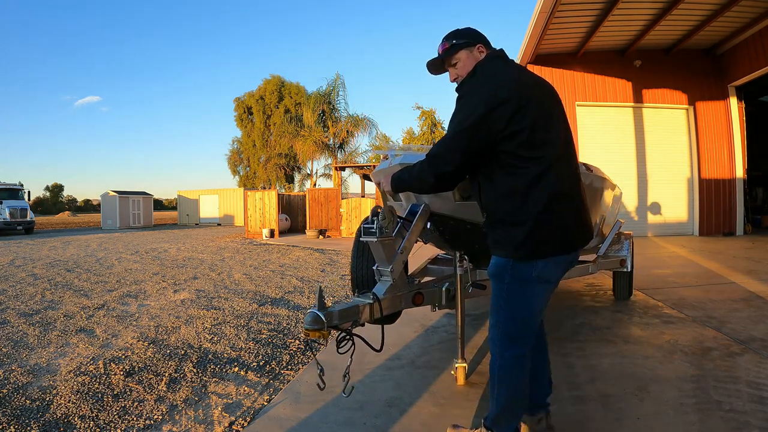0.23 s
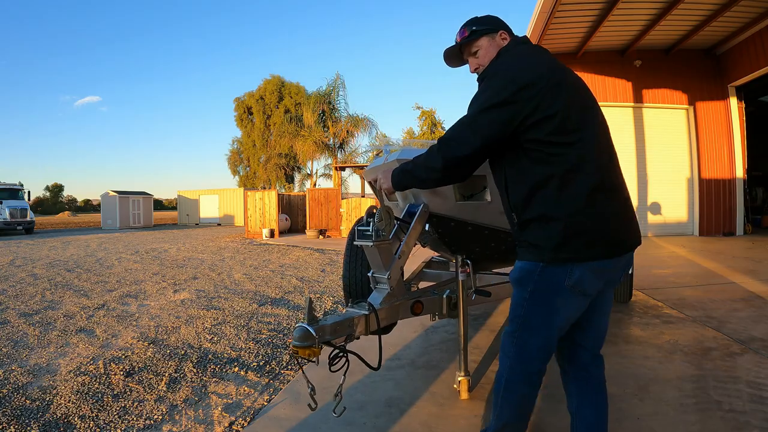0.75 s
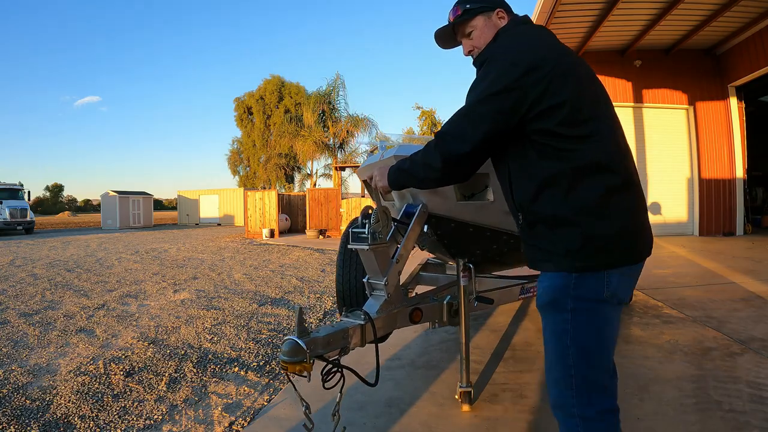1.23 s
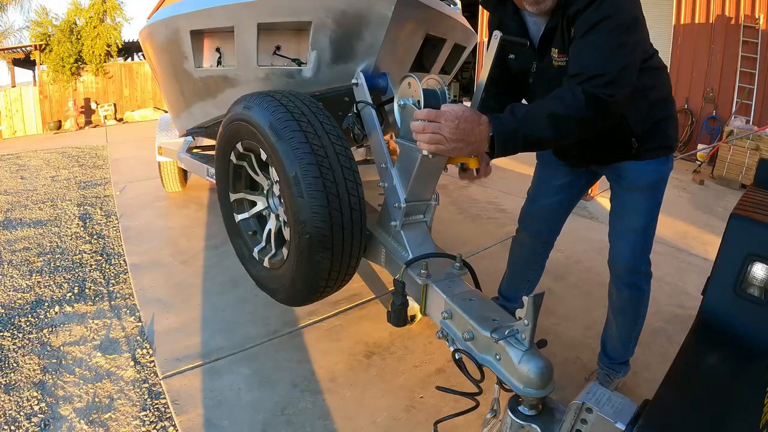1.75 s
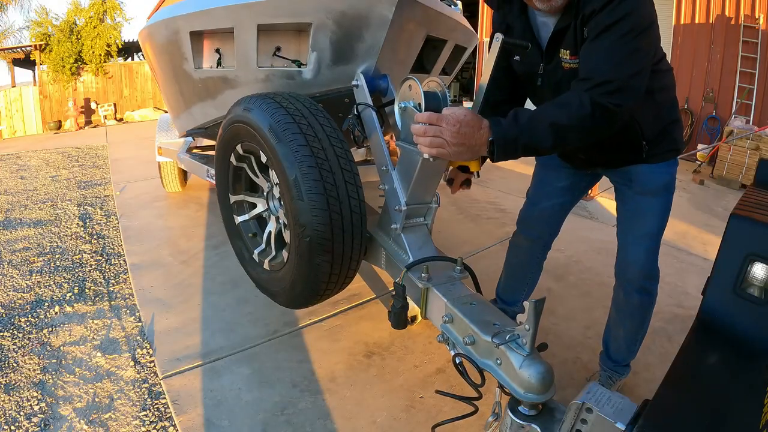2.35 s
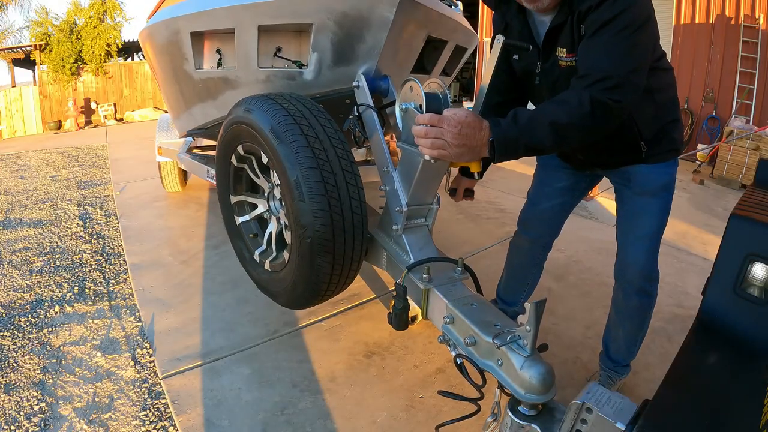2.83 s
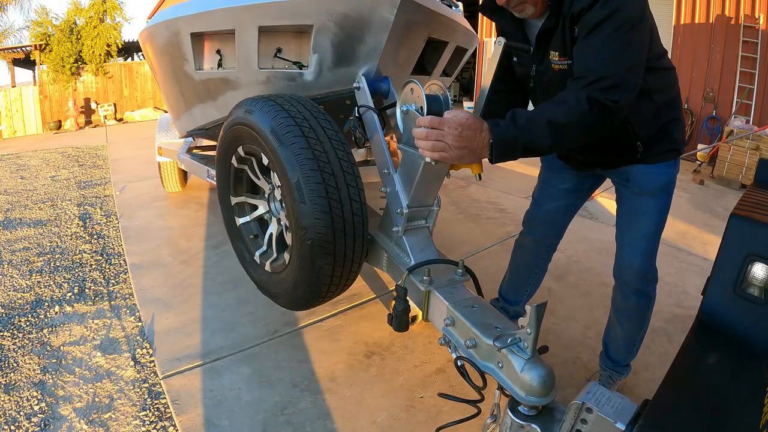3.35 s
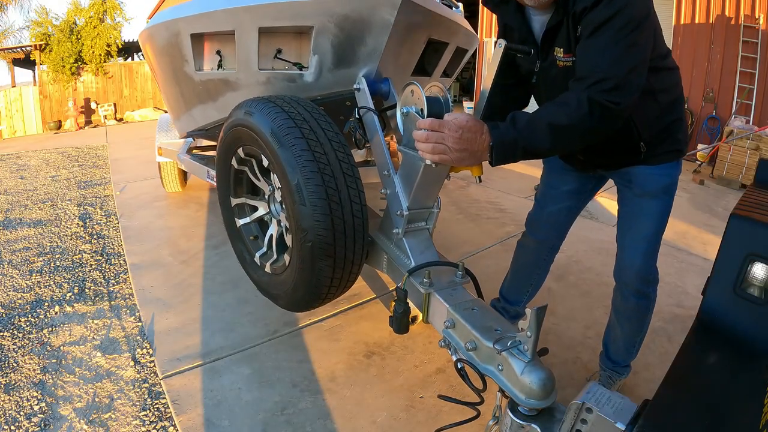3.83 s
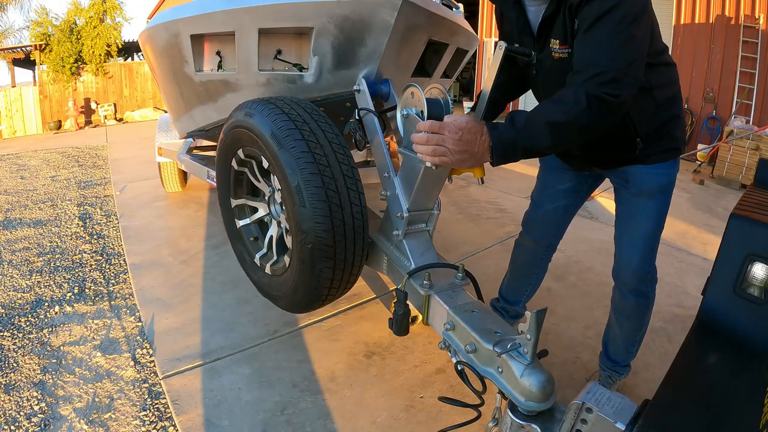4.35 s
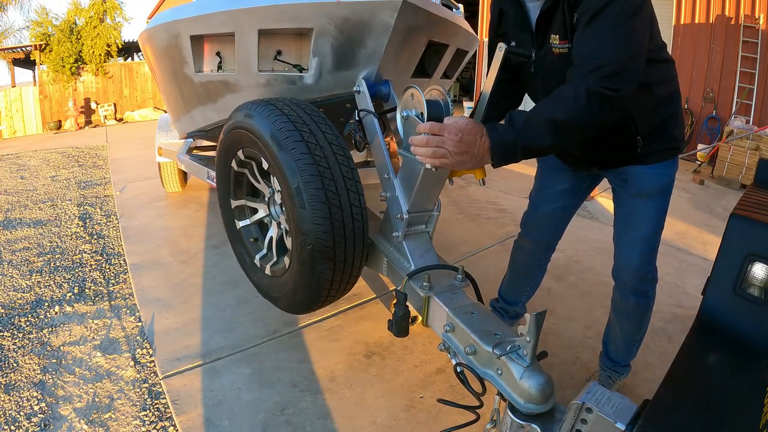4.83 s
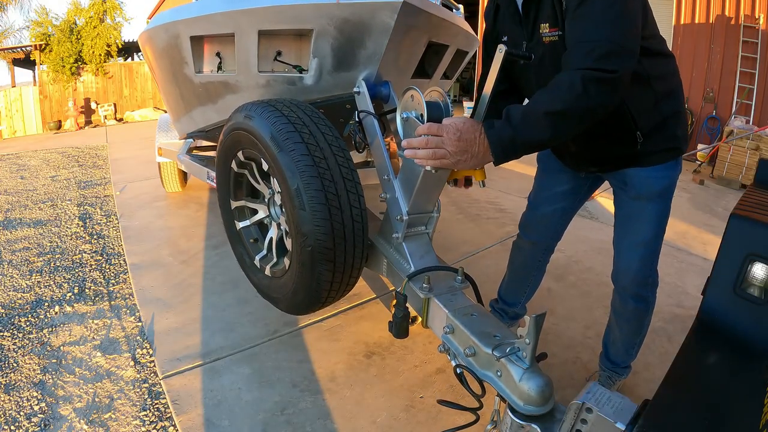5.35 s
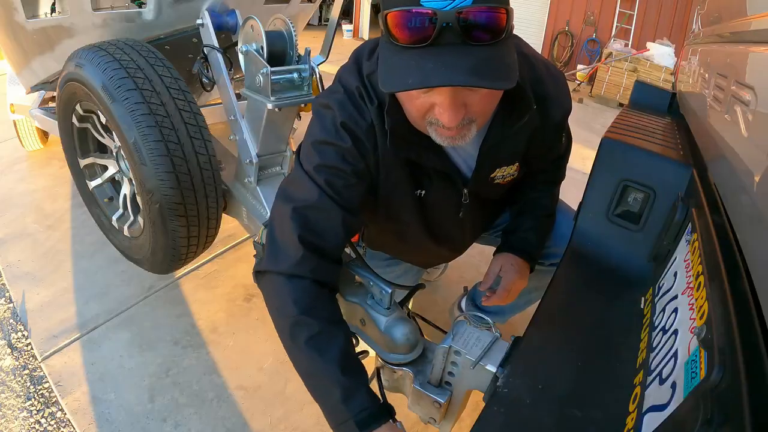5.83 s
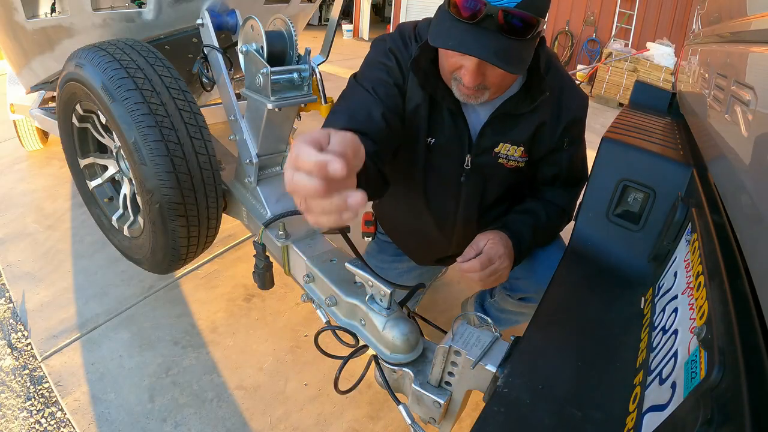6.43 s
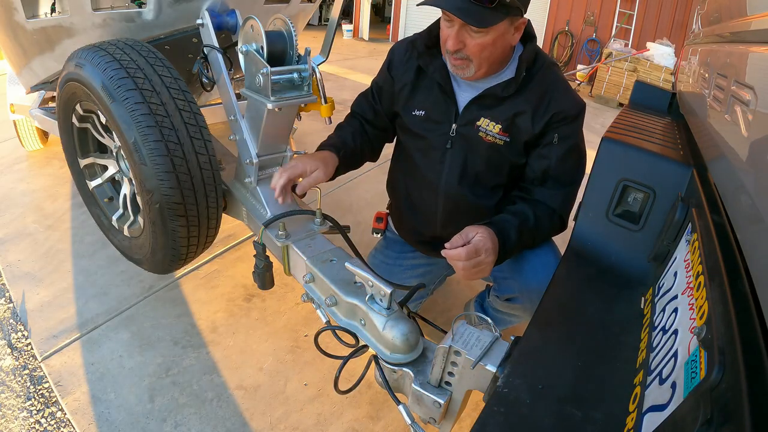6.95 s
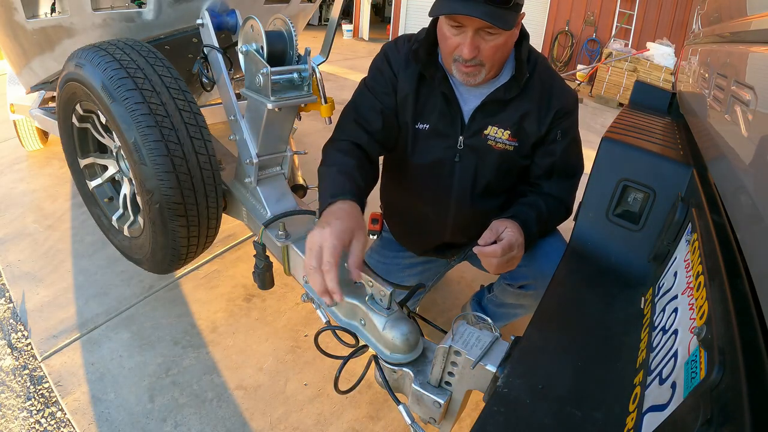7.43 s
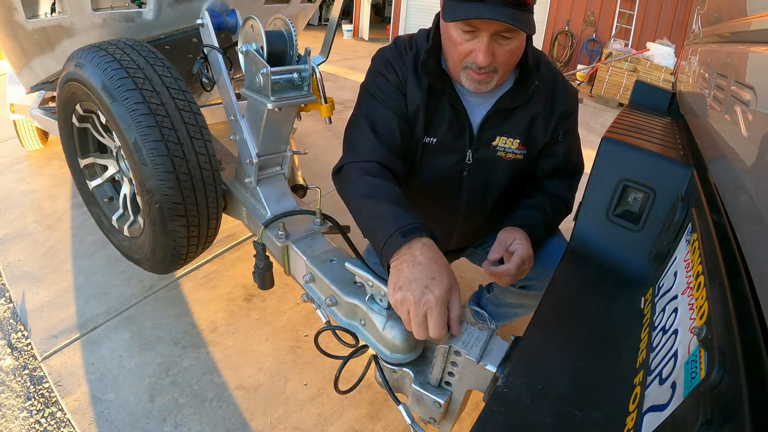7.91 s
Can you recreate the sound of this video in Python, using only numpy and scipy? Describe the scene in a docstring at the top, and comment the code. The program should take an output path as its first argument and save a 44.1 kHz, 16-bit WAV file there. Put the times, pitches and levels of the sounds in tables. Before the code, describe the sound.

Loose steel knocks and rattles as a trailer jack is cranked, then the hitch latch shuts with a loud ringing clank.

```python
"""Hitching a boat trailer

A trailer rolls to a car on a concrete yard, its hull droning. The jack is cranked up: loose steel
knocks and rattles, jolts boom in the hull. The coupler latch snaps shut, ringing a steel pin and
the hollow tongue. Distant traffic rumbles throughout; jacket sleeves rustle at the end."""
import sys
import numpy as np
from scipy import signal
from scipy.fft import rfft, irfft
from scipy.io import wavfile

SR = 44100
rng = np.random.default_rng(int(sys.argv[2]) if len(sys.argv) > 2 else 0)


def transcribe(signal):
    """Save signal, clipped to [-1, 1], as a 16-bit WAV file at the path in sys.argv[1]."""
    frames = np.atleast_2d(signal).T
    limited = np.clip(frames, -1, 1)
    pcm = np.round(limited * 32767).astype(np.int16)
    wavfile.write(sys.argv[1], SR, pcm)


N = 360738
TIME_S = np.arange(N) / SR
SPAN = 2 ** 14   # samples per blow
AGE_S = np.arange(SPAN) / SR

# jack and frame knocks: start_s, level_db, focus_hz, chatter_ms, tilt_db_per_octave, after_ring_db
JACK_KNOCKS = [(0.0762, -21.5, 1800, 15, -5.5, -4.5), (.1041, -24, 2600, 7.8, -8, -2),
               (0.1293, -14, 2650, 11, -12.5, -13), (.1634, -26, 2440, 4.9, -8, -6),
               (0.2712, -33.5, 2180, 6.7, -3, -3), (0.5077, -30, 2070, 4.1, -6, -2),
               (0.545, -34, 1480, 3.8, -3, 1), (.581, -38, 1240, 4.3, -8, -14),
               (0.5906, -15.5, 2000, 3.7, -6, -41), (0.862, -24.5, 1410, 15, -6.5, -29),
               (1.3859, -36, 1750, 3.3, 3, -1), (1.4058, -28.5, 4730, 15, 2, -18),
               (1.4746, -35, 1220, 7, -13, -3), (1.668, -19, 2500, 9.2, -1, -8.5),
               (1.69, -25.5, 2970, 4.9, -9, -6), (1.7787, -17, 2500, 11.5, -.5, -7),
               (1.8871, -20, 3000, 8.5, -6.5, -11.5), (2.004, -28.5, 2780, 5.3, 6, -8),
               (2.0538, -14.5, 6600, 8.9, 1.5, -14), (2.089, -15, 3230, 2, -7, -29),
               (2.101, -15.5, 1770, 2.7, -2.5, -7), (2.114, -24, 5500, 5, 6, -18),
               (2.136, -11, 2840, 2.8, -7.5, -17.5), (2.175, -24, 1270, 6, -2, -27),
               (2.2312, -19, 1230, 10, 1.5, -10), (2.2635, -20, 4200, 17, -4, -34),
               (2.2737, -6, 2570, 8.6, -2.5, -20.5), (2.36, -28, 2420, 8.7, -8, 1),
               (2.373, -24.5, 2800, 9.9, 9, -12), (2.4284, -18, 4530, 11, 8, -13),
               (2.4507, -16.5, 3270, 4.7, -5.5, -17), (2.4942, -19, 1230, 9.1, 1.5, -11.5),
               (2.586, -28.5, 1730, 8.7, 1, -14), (2.7884, -20.5, 2170, 9.7, -10.5, -16),
               (2.8412, -28.5, 2020, 4.5, -3, -4), (2.868, -24, 4400, 6, 9.5, -4),
               (2.882, -13.5, 3100, 3.7, -6, -11.5), (2.9032, -19, 2600, 6.4, 4.5, -13),
               (2.9733, -23.5, 3800, 5.8, 8.5, -9), (3.0018, -19.5, 1750, 2.2, -7, -11.5),
               (3.0268, -22, 3600, 12, 4.5, -12), (3.1078, -29.5, 1240, 6, -3, -9),
               (3.258, -28, 3500, 9.2, 0.5, -21), (3.3185, -23.5, 2960, 5.4, 4, 4.5),
               (3.3279, -18, 2270, 3.8, -6, 3), (3.3524, -8, 4470, 11, 9, -10),
               (3.3948, -16.5, 2540, 6.1, -8.5, -4.5), (3.5562, -22, 1230, 8.8, -3.5, -18),
               (3.6705, -9, 2540, 14.5, -4.5, -16.5), (3.7455, -18, 1920, 6.4, -1.5, -2),
               (3.7722, -19, 3360, 11, 6.5, -20), (3.805, -26, 1990, 4.6, 4, -7),
               (3.8704, -18.5, 2500, 21, 3, -26), (3.923, -20, 3540, 6.1, 7, -14),
               (3.9732, -11, 2770, 11, -6.5, -14), (3.995, -26, 3430, 5.9, -1, -6),
               (4.216, -22.5, 1750, 7.8, -3, -5), (4.2499, -5.5, 6860, 9.7, -0.5, -13.5),
               (4.349, -20.5, 6530, 6, 2, -13), (4.4059, -19, 2130, 4, -5, -15),
               (4.433, -20, 1260, 6.7, -1, -13), (4.456, -9.5, 2330, 12.4, -4.5, -13.5),
               (4.7142, -23, 1700, 17, -0.5, -5), (4.848, -8.5, 3140, 2, -3.5, -19),
               (4.877, -34, 1210, 8.1, 11, -20), (4.9934, -27.5, 2140, 5, -9.5, -7),
               (5.2489, -19.5, 2110, 10.4, 1, -7), (5.3975, -9, 3640, 2.7, -3, -15.5),
               (5.444, -33.5, 2000, 3.7, 1, -35), (5.5689, -17.5, 3460, 4.6, -1.5, -9.5),
               (5.6035, -24, 2650, 2.9, -3, -3.5), (5.837, -5.5, 4940, 11, 8, -19),
               (5.951, -16, 5000, 6, 10, -13), (6.2636, -29.5, 1920, 5.4, 14, -22)]


def from_db(db):
    """Decibels to gain."""
    return 10 ** (np.asarray(db) / 20)


def rms_one(x):
    """Scale to rms 1."""
    return x / np.sqrt(np.mean(x ** 2) + 1e-20)


def peak_one(x):
    """Scale to peak 1."""
    return x / np.max(np.abs(x))


def add(out, start_s, sound):
    """Mix in one blow."""
    i = round(start_s * SR)
    out[i:i + SPAN] += sound[:N - i]


def flicker(spread_db, rate_hz):
    """Randomly wandering gain."""
    knots = rng.standard_normal(1000)
    return from_db(spread_db * np.interp(TIME_S * rate_hz, np.arange(1000), knots))


def burst(rise_ms, fall_ms):
    """Envelope of a run of micro-contacts: swells, then dies."""
    rise = (1 - np.exp(-AGE_S * 1000 / max(rise_ms, .15))) ** 2
    return rise * np.exp(-AGE_S * 1000 / max(fall_ms, .3))


def coloured(spectrum, size, focus_hz=1000, tilt_db_per_octave=0, focus_db=0):
    """Noise with a given spectrum, tilted and lifted about a focus; rms 1."""
    hz = np.maximum(np.arange(size // 2 + 1) * SR / size, 1)
    freq_hz, density_db = np.transpose(spectrum)
    octaves = np.log2(hz / focus_hz)
    shape_db = np.interp(np.log(hz), np.log(freq_hz), density_db)
    shape_db += tilt_db_per_octave * octaves + focus_db * np.exp(-(octaves / 0.61) ** 2)
    return rms_one(irfft(rfft(rng.standard_normal(size)) * from_db(shape_db), size))


def body(modes, max_t60_s):
    """Pitch, level and free ring of each mode; neighbours start in opposite directions."""
    pitch_hz, level_db, t60_s = np.transpose(modes)
    decay = from_db(-60 * AGE_S / np.clip(t60_s, .01, max_t60_s)[:, None])
    polarity = (-1) ** np.arange(len(pitch_hz))[:, None]
    return pitch_hz, level_db, polarity * decay * np.sin(2 * np.pi * pitch_hz[:, None] * AGE_S)


def struck(part, contacts, spread_db, focus_hz=1000, tilt_db_per_octave=0, focus_db=0):
    """Micro-contacts ring a body's modes, favouring those near the struck spot's pitch; peak 1."""
    pitch_hz, level_db, rings = part
    octaves = np.log2(pitch_hz / focus_hz)
    colour_db = focus_db * np.exp(-(octaves / .42) ** 2) + tilt_db_per_octave * octaves
    strength = from_db(level_db + spread_db * rng.standard_normal(len(pitch_hz)) + colour_db)
    force = contacts * rng.standard_normal(SPAN)
    mode_force = np.abs(rfft(force))[np.round(pitch_hz * SPAN / SR).astype(int)]
    weight = strength / np.hypot(mode_force, .4 * np.linalg.norm(force))   # evens out the drive
    return peak_one(signal.fftconvolve(weight @ rings, force)[:SPAN])


def far_road():
    """Deep, uneven rumble of distant traffic."""
    road_spectrum = [(15, -61), (25, -65), (48, 4), (97, 10), (130, -14.5), (170, -27), (290, -120)]   # freq_hz, density_db
    road_levels = [(0.0, -52), (0.59, -53.5), (1.23, -65), (1.69, -54), (2.07, -72), (2.39, -59.5),
                   (3.82, -55), (4.55, -70), (5.67, -64), (5.95, -55), (7.04, -64), (8.18, -63)]   # time_s, level_db
    gain = from_db(np.interp(TIME_S, *np.transpose(road_levels)))
    return gain * flicker(spread_db=3.5, rate_hz=17) * coloured(road_spectrum, N)


def frame_shake():
    """Amplitude of the trembling frame: each knock adds power that dies away."""
    power = np.zeros(N)
    follow_db_per_db = 0.55
    for start_s, level_db, *_ in JACK_KNOCKS:
        add(power, start_s, from_db(2 * follow_db_per_db * level_db) * burst(rise_ms=15.7, fall_ms=42))
    return np.sqrt(power)


def yard(hiss_gain):
    """Traffic rumble, mid wash and gritty hiss, each raised by the shaking frame."""
    # noise spectra: freq_hz, density_db
    rumble_spectrum = [(53, -43.5), (90, -13.5), (124, -1.5), (162, 0.5), (236, 2.5), (318, 3.5),
                       (347, -9.5), (382, -2.5), (459, -15.5), (900, -12.5), (1170, -26), (1980, -120)]
    wash_spectrum = [(210, -21), (350, -4), (400, 0), (456, 0), (521, -3), (759, -3.5), (858, -5),
                     (1210, -6), (1700, -8), (2480, -21), (4000, -27), (5200, -58), (8800, -120)]
    hiss_spectrum = [(880, -51), (1500, -4.5), (2510, -4), (3810, -5), (5380, -16), (5830, -16),
                     (7240, -20), (9100, -37), (10600, -27.5), (16000, -68)]
    rest_levels = [(0, -40.5, -54, -57), (.23, -37.5, -47, -71), (.36, -41.5, -52, -57.5),
                   (.7, -41.5, -51, -52), (1.09, -46, -52, -58.5), (1.5, -42, -52.5, -64.5),
                   (2.0, -41.5, -47.5, -46), (2.55, -39, -45, -44), (2.85, -42.5, -50.5, -55),
                   (3.2, -39, -51, -49), (3.85, -38, -44.5, -46), (4.1, -40.5, -49, -47.5),
                   (4.76, -41, -50, -51.5), (5.1, -42.5, -53, -52), (5.6, -44, -46.5, -51),
                   (6.33, -40.5, -44, -45), (6.991, -42.5, -41.5, -51), (7.47, -41.5, -45, -52),
                   (8.18, -41.5, -41.5, -56)]   # background at rest: time_s, rumble_db, wash_db, hiss_db
    time_s, rumble_db, wash_db, hiss_db = np.transpose(rest_levels)
    shake = frame_shake()

    def layer(spectrum, rest_db, shake_db, spread_db, rate_hz):
        rest = from_db(np.interp(TIME_S, time_s, rest_db))
        gain = np.hypot(rest, from_db(shake_db) * shake)
        return gain * flicker(spread_db, rate_hz) * coloured(spectrum, N)

    rumble = layer(rumble_spectrum, rumble_db, shake_db=-34, spread_db=1.5, rate_hz=9)
    wash = layer(wash_spectrum, wash_db, shake_db=-33.5, spread_db=2.24, rate_hz=25)
    hiss = layer(hiss_spectrum, hiss_db, shake_db=-38.5, spread_db=1.8, rate_hz=30)
    return rumble + wash + hiss_gain * hiss


def hums():
    """Faint low tones that swell and fade."""
    tones = [(2.557, 0.022, 258.7, -26.5), (6.73, 0.089, 232, -37), (7.904, 0.17, 142.8, -41.5)]   # centre_s, half_length_s, pitch_hz, level_db
    out = np.zeros(N)
    for centre_s, half_length_s, pitch_hz, level_db in tones:
        swell = np.exp(-((TIME_S - centre_s) / half_length_s) ** 4)
        out += from_db(level_db) * swell * np.sin(2 * np.pi * pitch_hz * TIME_S)
    return out


def drones():
    """Noise-driven resonances: the rolling trailer's hull, later a faint whir."""
    resonances = [(323.2, 3.9, [(0, -43), (.25, -39), (.51, -51), (.56, -36.5), (.73, -70), (.79, -38),
                  (.9, -42), (1.13, -53), (1.36, -75), (1.52, -45), (1.6, -52)]), (1750, 63, [(6.4, -53),
                  (6.86, -58), (7.19, -44), (7.32, -65), (7.6, -77), (7.92, -62), (8.18, -54)])]   # pitch_hz, width_hz, [(time_s, level_db), ...]
    out = np.zeros(N)
    for pitch_hz, width_hz, levels in resonances:
        radius, angle = np.exp(-np.pi * width_hz / SR), 2 * np.pi * pitch_hz / SR
        feedback = [1, -2 * radius * np.cos(angle), radius ** 2]
        ring = signal.lfilter([1, 0, -1], feedback, rng.standard_normal(N))
        level_db = np.interp(TIME_S, *np.transpose(levels), left=-120, right=-120)
        out += from_db(level_db) * rms_one(ring)
    return out


def jacket():
    """Sleeves brush close by; each stroke swells and stops."""
    cloth_spectrum = [(1200, -14), (2000, 2.5), (3000, 0.5), (4700, 2.5), (5900, -1), (7100, -6.5),
                      (9000, -19), (10700, -13.5), (13600, -42), (16000, -58)]   # freq_hz, density_db
    strokes = [(6.62, 0.72, -51.5), (6.96, 0.32, -45), (7.29, 0.48, -55), (7.54, 0.16, -52.5),
               (7.81, 0.2, -50), (7.95, 0.077, -55.5), (8.052, 0.026, -50), (8.18, .06, -44.5)]   # loudest_s, swell_s, level_db
    rest_db, stop_s = -67, 0.042
    gain = np.full(N, from_db(rest_db))
    for loudest_s, swell_s, level_db in strokes:
        width_s = np.where(TIME_S < loudest_s, swell_s, stop_s)
        gain += from_db(level_db) * np.exp(-((TIME_S - loudest_s) / width_s) ** 2)
    return gain * flicker(spread_db=0.74, rate_hz=40) * coloured(cloth_spectrum, N)


def dry_click():
    """One sharp, dry broadband click: a step that sags back within milliseconds."""
    steps = [(5.6277, -9, 0.94)]   # start_s, peak_db, decay_ms
    out = np.zeros(N)
    for start_s, peak_db, decay_ms in steps:
        sag = AGE_S * 1000 / decay_ms
        add(out, start_s, from_db(peak_db) * (1 - sag) * np.exp(-sag))
    return out


def hull_thumps():
    """Jolts give a dull thud and ring the hull's low modes."""
    hull_modes = [(165, -8, 0.21), (210, 8.5, 0.04), (271, 2, 0.17), (331, 1, 0.3), (375, -10, 0.091),
                  (429, -9, 0.16)]   # pitch_hz, level_db, t60_s
    jolts = [(.104, -30), (0.1322, -29), (0.1616, -31), (.545, -27.5), (.588, -21), (.861, -35),
             (1.4762, -30), (1.678, -22.5), (1.779, -27), (2.053, -25.5), (2.091, -28.5), (2.136, -31),
             (2.427, -33.5), (2.494, -29), (2.883, -30), (2.905, -31.5), (3.106, -32.5), (3.352, -21.5),
             (3.394, -24.5), (3.671, -38), (3.771, -30), (3.804, -24), (3.92, -27.5), (4.255, -26),
             (4.349, -31.5), (4.459, -29.5), (5.251, -27.5)]   # start_s, level_db
    out, hull = np.zeros(N), body(hull_modes, max_t60_s=0.14)
    lowpass = signal.butter(2, 575, fs=SR, output="sos")
    for start_s, level_db in jolts:
        impact = rng.standard_normal(SPAN) * burst(0.33, 4.5)
        thud = peak_one(signal.sosfilt(lowpass, impact))
        boom = struck(hull, burst(1.56, 4.9), spread_db=8.0)
        add(out, start_s, from_db(level_db) * (boom + from_db(-2) * thud))
    return out


def pings():
    """Small parts, briefly touched, each ring one short note."""
    notes = [(.863, 1420, -27, 0.044), (1.889, 3080, -23, 0.045), (1.781, 2700, -29, 0.11),
             (2.279, 2460, -32, 0.081), (3.671, 3280, -18, 0.07), (4.252, 5900, -23, 0.077),
             (4.848, 1910, -18.5, 0.039), (5.398, 1930, -17, 0.023), (5.443, 1990, -22.5, 0.027),
             (5.808, 3840, -19, 0.044), (5.95, 3720, -10, .07), (6.033, 6180, -32, .04),
             (6.2, 2270, -25.5, 0.14)]   # start_s, pitch_hz, peak_db, t60_s
    out = np.zeros(N)
    for start_s, pitch_hz, peak_db, t60_s in notes:
        ring = from_db(-60 * AGE_S / t60_s) * np.sin(2 * np.pi * pitch_hz * AGE_S)
        touch = burst(0.49, 1.43) * rng.standard_normal(SPAN)
        add(out, start_s, from_db(peak_db) * peak_one(signal.fftconvolve(ring, touch)[:SPAN]))
    return out


def jack_knocks():
    """Loose steel parts collide: a crack, short jack modes, a dense after-ring of frame and yard."""
    jack_modes = [(866, -13, .05), (1240, -6, .08), (1450, -6, .05), (1660, -4, .05), (1830, -5, .05),
                  (2000, 0, .09), (2280, -2, .07), (2460, 1, .11), (2640, -3, .07), (2780, -2, .08),
                  (3130, 0, .08), (3420, 0, .09), (3640, -1, .08), (3800, -3, .05), (4260, -4, .04),
                  (4590, -8, .04), (4920, -9, .04), (5410, -10, .04), (5870, -7, .06), (6090, -14, .035),
                  (6360, -16, .03), (6700, -19, .025), (7200, -21, .025), (8200, -28, .025)]   # pitch_hz, level_db, t60_s
    frame_spectrum = [(290, -77), (500, -43.5), (668, -13), (795, -9), (2290, -3), (2500, 0.5), (5240, -2),
                      (5880, -3.5), (9090, -21.5), (10700, -20.5), (12500, -42), (14000, -50), (16000, -58)]   # freq_hz, density_db
    out, jack = np.zeros(N), body(jack_modes, max_t60_s=.14)
    rise_ms = 0.78
    for start_s, level_db, focus_hz, chatter_ms, tilt_db_per_octave, after_ring_db in JACK_KNOCKS:
        colour = dict(focus_hz=focus_hz, tilt_db_per_octave=tilt_db_per_octave)
        frame_noise = coloured(frame_spectrum, SPAN, focus_db=7.5, **colour)
        snap = from_db(level_db + 9.0) * burst(0.49, 0.92)   # harder blows tick more sharply
        crack = peak_one(frame_noise * (burst(rise_ms, chatter_ms) + snap))
        contacts = burst(rise_ms, 0.2 * chatter_ms) + snap
        ring = struck(jack, contacts, spread_db=5.0, focus_db=11.0, **colour)
        ring_db = -7.5 + 0.7252 * tilt_db_per_octave   # brighter knocks ring more
        buzz = struck(jack, burst(4.4, 26.7), spread_db=3.7, focus_db=6.0, **colour)
        after_ring = from_db(-10.0) * frame_noise[::-1] * burst(9.0, 49) + 0.69 * buzz
        knock = 0.7 * crack + from_db(ring_db) * ring + from_db(after_ring_db) * after_ring
        add(out, start_s, from_db(level_db) * knock)
    return out


def coupler_latch():
    """Each blow rings the steel pin and the hollow tongue; loose parts clatter."""
    # modes: pitch_hz, level_db, t60_s
    pin_modes = [(2219, -27, .3), (2900, -24, .05), (3596, -19, .11), (3800, -18, .06), (4090, -19, .06),
                 (4285, -19, .14), (4390, -15, .22), (4425, -12, .19), (4619, -21, .13), (4750, -19, .06),
                 (4975, -16, .14), (5117, -10, .09), (5203, -4, .13), (5290, -13, .06), (5450, -17, .05),
                 (5760, -19, .05), (6100, -23, .07), (6445, -20, .12), (8366, -28, .06), (8700, -29, .14),
                 (9960, -36, .14), (10550, -38, .1), (11050, -38, .13), (12000, -44, .06),
                 (12900, -44, .06)]
    tongue_modes = [(173, -2, 0.18), (215, -4, 0.39), (254, 8, 0.24), (318.4, 0.5, 0.38), (425, 6, 0.18),
                    (470, -1, 0.63), (505, 8, 0.11), (626, 4, 0.1), (858, 3, 0.17), (899, 3.5, .11),
                    (1007, 7.5, 0.058), (1073, -6, 0.22), (1210, -4, 0.11), (1320, -27, 0.083),
                    (1475, -8, 0.36), (1814, -4, 0.3), (1862, -13, 0.15), (1901, -5.5, 0.14),
                    (2240, -35, 0.089), (2580, -5, 0.18), (3380, -12.5, 0.14), (6175, -46, 0.044)]
    clatter_spectrum = [(200, -31), (400, -22.5), (870, -3.5), (1800, -2.5), (2700, -20), (3800, -10.5),
                        (5100, -16), (7000, -38), (10900, -74), (16000, -100)]   # freq_hz, density_db
    blows = [(5.626, -30.5, -17.5, -29, 260), (5.65, -47, -19.5, -30, 250), (5.678, -34, -17, -32, 410),
             (5.725, -41, -23.5, -52, 260), (5.757, -41, -21, -40, 412), (5.774, -37, -16, -33, 373),
             (5.802, -34, -14.5, -21, 980), (5.812, -19.5, -16.5, -42, 860), (5.836, -1.5, -14.5, -45, 253),
             (5.851, -4.5, -21, -48, 263), (5.874, -16, -24, -46, 447), (5.933, -26, -16.5, -18.5, 1040),
             (5.944, -19, -18, -9.5, 1200), (5.954, -14.5, -5, -16, 1020), (5.962, -35, -7, -14.5, 1820),
             (5.973, -35, -10, -37, 845), (5.997, -27, -10, -48, 236), (6.022, -45, -15.5, -17.5, 447),
             (6.031, -34, -6, -21, 1040), (6.047, -32, -16, -33, 323), (6.079, -46, -19.5, -32, 245),
             (6.115, -54, -9, -26, 248), (6.15, -54, -10, -37, 250), (6.165, -41, -13, -36, 877),
             (6.198, -35.5, -13.5, -32, 1210), (6.221, -46, -16, -33, 253), (6.282, -50, -24.5, -50, 550)]   # start_s, pin_db, tongue_db, clatter_db, focus_hz
    pin, tongue = body(pin_modes, max_t60_s=.24), body(tongue_modes, max_t60_s=.2)
    lowpass = signal.butter(4, 4200, fs=SR, output="sos")   # the tongue's ring stays below the top treble, with no high tick
    rise_ms, chatter_ms = 2.05, 5.1
    pin_contacts = burst(.5 * rise_ms, chatter_ms) + 0.12 * burst(rise_ms, 34)   # loose: keeps touching
    tongue_contacts = burst(1.2 * rise_ms, chatter_ms) + .1 * burst(rise_ms, 25)
    clatter_contacts = burst(1.7 * rise_ms, 2 * chatter_ms) + 0.34 * burst(rise_ms, 31)
    out = np.zeros(N)
    for start_s, pin_db, tongue_db, clatter_db, focus_hz in blows:
        ring = from_db(pin_db) * struck(pin, pin_contacts, spread_db=2.5)
        boom = struck(tongue, tongue_contacts, spread_db=3.0, focus_hz=focus_hz, focus_db=10.5)
        boom = from_db(tongue_db) * signal.sosfilt(lowpass, boom)
        clatter = from_db(clatter_db) * coloured(clatter_spectrum, SPAN) * clatter_contacts
        add(out, start_s, ring + boom + clatter)
    return out


def scene():
    """Near-mono mix, wide only in the top treble; the steel radiates no deep bass and little top."""
    radiated_band = signal.butter(4, [140, 15500], "band", fs=SR, output="sos")
    trailer = signal.sosfilt(radiated_band, jack_knocks() + pings() + hull_thumps() + coupler_latch())
    jacket_from_s, fade_s = 6.3, 0.11
    jacket_gain = np.clip((TIME_S - jacket_from_s) / fade_s, 0, 1)
    background = far_road() + yard(hiss_gain=1 - jacket_gain) + jacket_gain * jacket()
    mid = trailer + background + dry_click() + hums() + drones()
    top = signal.sosfilt(signal.butter(8, 12500, "high", fs=SR, output="sos"), mid)
    treble = signal.sosfilt(signal.butter(1, 2500, "high", fs=SR, output="sos"), mid)
    side = np.roll(from_db(0.5) * top + from_db(-46.0) * treble, 397)   # 9 ms late
    return np.array([mid + side, mid - side])


def record(dry):
    """Narrow microphone-port dip, peak clipping, steep top cut."""
    notch_hz, width_hz, stopband_hz = 8980, 430, 16400
    notched = signal.lfilter(*signal.iirnotch(notch_hz, notch_hz / width_hz, SR), dry)
    clipped = np.clip(notched, -1, 1)
    return signal.sosfilt(signal.cheby2(12, 70, stopband_hz, fs=SR, output="sos"), clipped)


dry = scene()
out = record(dry)
transcribe(out)
```